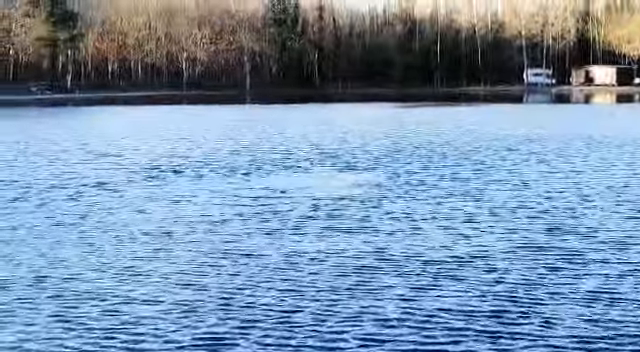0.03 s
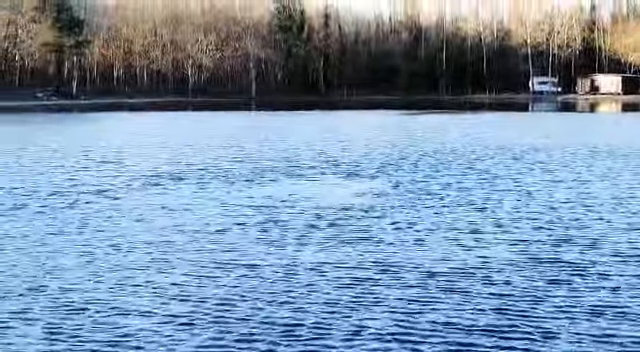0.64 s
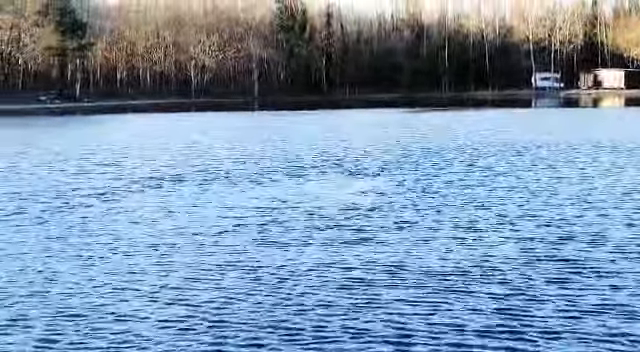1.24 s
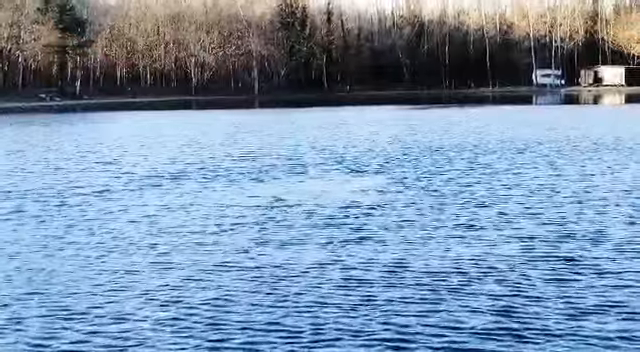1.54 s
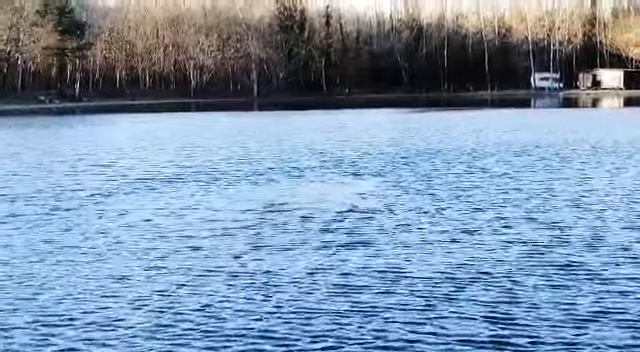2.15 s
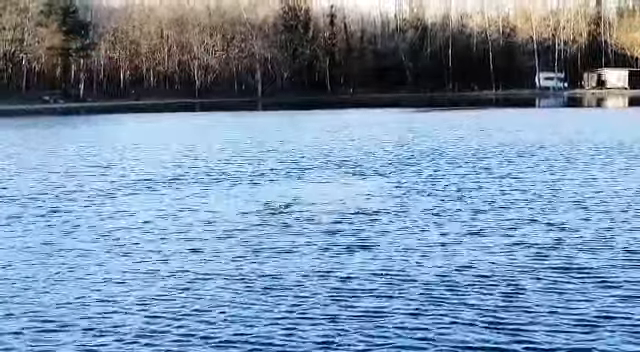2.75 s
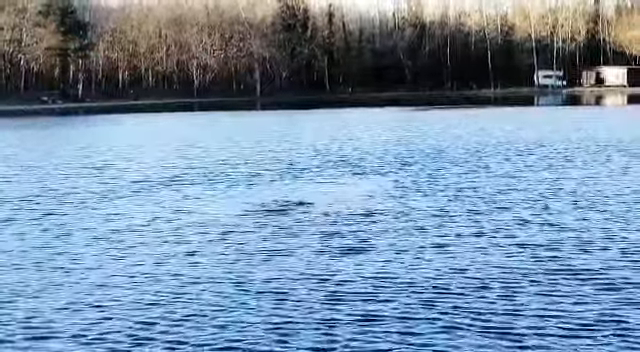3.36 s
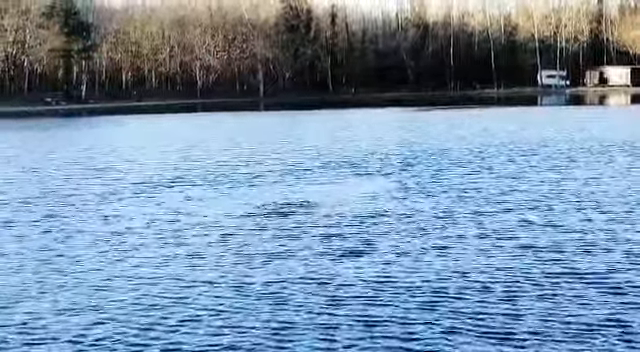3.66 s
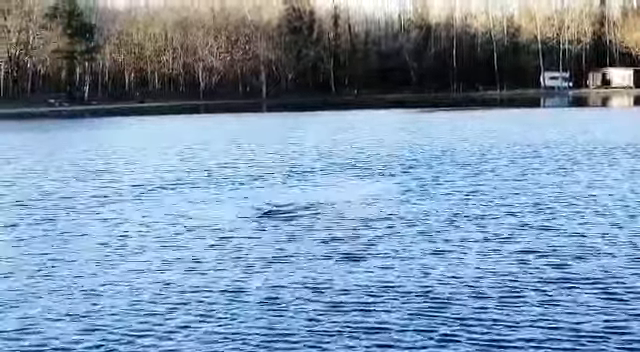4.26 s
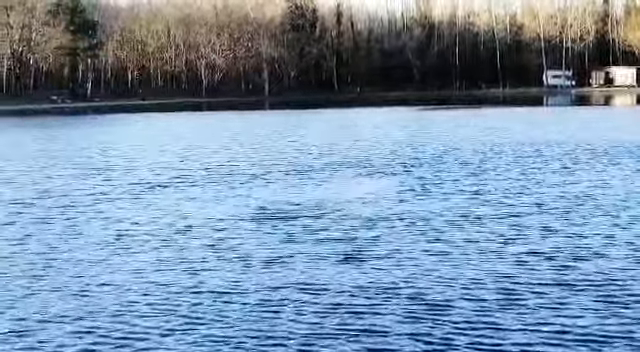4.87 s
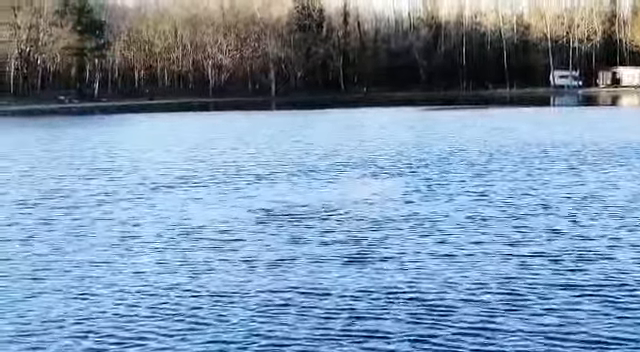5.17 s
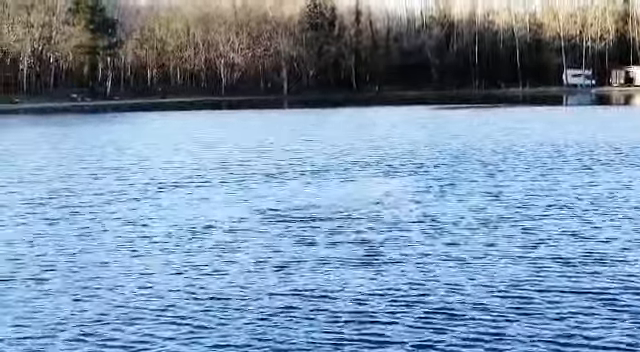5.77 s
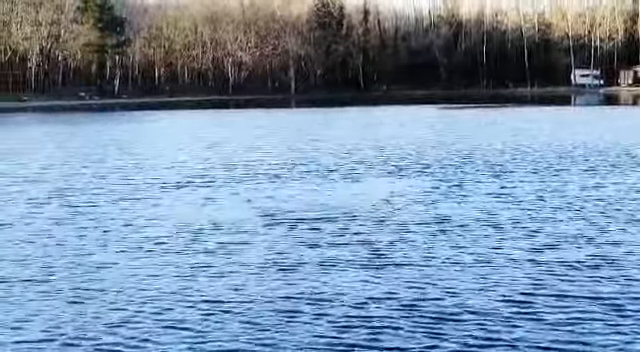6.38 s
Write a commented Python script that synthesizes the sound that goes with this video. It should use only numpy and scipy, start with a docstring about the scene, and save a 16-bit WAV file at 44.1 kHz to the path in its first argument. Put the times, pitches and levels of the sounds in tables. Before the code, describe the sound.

A fishing reel sits close on the left, outdoors by a lake. From 0.1 to 0.9 seconds its drag gives three bright, metallic buzzes that speed up and brake, over a soft whirr of winding. The handle clacks at about 1.1 seconds, and taut line rubs faintly through the rod's rings until 1.5. Low wind buffets the microphone, strongest from 1.3 to 2.3 seconds and in a sharp gust near 3.6, shifting between sides. The drag zips briefly at 1.8 seconds, ticks four times, and zips again at 2.8. A few faint water plinks sound between 2.9 and 3.8 seconds. After a click near 4.3, four quick drag bursts run with more winding until 5.3 seconds, ending in a light knock and one last tick. Light wind and a faint, steady rustle of distant trees continue to the end, at about 6.6 seconds.

```python
"""A spinning reel's drag ticks and buzzes as a hooked fish takes line off a lake shore: the pawl snaps
over the spool's teeth, in single clicks and in short pulls that speed up and brake again.
The angler winds in two spells: gears whirr, the rotor taps and the handle stops with a clack.
The taut line creeps once through the rod's rings. Gusts buffet the two microphone ports,
far trees rustle, and ripples plink at the bank as small bubbles ring."""
import sys
import numpy as np
from scipy import signal
from scipy.fft import rfft, irfft, next_fast_len
from scipy.io import wavfile
from scipy.ndimage import map_coordinates

SR = 44100
rng = np.random.default_rng(int(sys.argv[2]) if len(sys.argv) > 2 else 0)


def master_out(mix):
    """Clip the mix to full scale and print it as 16-bit PCM to the path in sys.argv[1]."""
    frames = np.transpose(np.atleast_2d(mix))
    ceiling = np.clip(frames, -1, 1)
    pcm = np.round(ceiling * 32767).astype(np.int16)
    wavfile.write(sys.argv[1], SR, pcm)


N = 292406

# The fish pulls, the spool spins up and brakes. Each row: first click, fastest moment and last click
# in seconds, top and final speed in teeth per second, click level in dB.
PULLS = [(.1204, .265, .372, 187, 125, -23.3), (.58, .625, .6996, 190, 50, -24),
         (.7484, .85, .8975, 285, 120, -24.5), (1.7463, 1.798, 1.8392, 96, 45, -22.5),
         (2.7762, 2.813, 2.8442, 90, 45, -24), (4.4429, 4.469, 4.4947, 63, 50, -23.7),
         (4.5116, 4.592, 4.661, 222, 55, -23), (4.8312, 4.887, 4.9395, 270, 70, -24),
         (5.0364, 5.125, 5.2383, 320, 60, -23.7)]
SLIP_RATE = 45  # teeth per second at which the drag breaks loose


def amp(db):
    """Decibels to gain."""
    return 10 ** (np.asarray(db) / 20)


def unit(x):
    """x scaled to rms 1."""
    return x / np.sqrt(np.mean(x ** 2) + 1e-20)


def along(points, hz):
    """A curve through (Hz, value) points, read at hz on a log axis."""
    freqs, values = np.transpose(points)
    return np.interp(np.log(hz + 1), np.log(freqs + 1), values)


def curves(rows):
    """One per-sample envelope for each column after the time."""
    times, *columns = np.transpose(rows)
    return [np.interp(np.arange(N) / SR, times, column) for column in columns]


def wobble(rate):
    """A smooth random curve with rate knots a second."""
    knots = rng.standard_normal(int(N * rate / SR) + 4)
    return map_coordinates(knots, [np.arange(N) * rate / SR])


def arch(t, start, top, stop):
    """A half sine that rises from 0 at start to 1 at top and is back to 0 at stop."""
    return np.abs(np.sin(np.interp(t, [start, top, stop], [0, np.pi / 2, np.pi])))


def swells(rows):
    """Summed power of bell-shaped swells, each (centre s, half length s, dB)."""
    power = np.zeros(N)
    for centre, half, db in rows:
        i = np.arange(max(0, round((centre - 4 * half) * SR)), min(N, round((centre + 4 * half) * SR)))
        power[i] += (amp(db) * np.exp(-((i / SR - centre) / half) ** 2)) ** 2
    return power


def filtered(x, response):
    """x through a complex frequency response."""
    size = next_fast_len(N + SR // 2)
    return irfft(rfft(x, size) * response(np.fft.rfftfreq(size, 1 / SR)), size)[..., :N]


def delayed(x, seconds):
    """x arriving later."""
    return filtered(x, lambda hz: np.exp(-2j * np.pi * hz * seconds))


def noise(spectrum):
    """Coloured noise of rms 1."""
    return unit(filtered(rng.standard_normal(N), lambda hz: amp(along(spectrum, hz))))


def body(x, spectrum, modes=(), size=2048):
    """x through a body of unit energy: a broad colour with resonances on it."""
    hz = np.fft.rfftfreq(size, 1 / SR)
    peaks_db = sum(db / (1 + (2 * (hz - centre) / width) ** 2) for centre, width, db in modes)
    cepstrum = irfft(np.log(amp(along(spectrum, hz) + peaks_db)))
    cepstrum[1:size // 2] *= 2  # minimum phase: the ring follows the hit
    cepstrum[size // 2 + 1:] = 0
    ring = irfft(np.exp(rfft(cepstrum)))
    return signal.fftconvolve(x, ring[None] / np.linalg.norm(ring), axes=1)[:, :N]


def ringing(x, modes):
    """x exciting resonators, each (Hz, width Hz, dB)."""
    return filtered(x, lambda hz: sum(amp(db) * 1j * hz * width / (centre**2 - hz**2 + 1j * hz * width)
                                      for centre, width, db in modes))


def contacts(rows, chatter_s, tail_db, tail_t60, scatter, repeat):
    """Each (s, dB) contact chatters and leaves a weak tail; repeat is the share alike in every hit."""
    t = np.arange(SR // 20) / SR
    shape = np.exp(-(t / chatter_s) ** 1.2) + amp(tail_db - 60 * t / tail_t60)
    shape *= np.sqrt(SR * .005 / np.sum(shape ** 2))
    # The same parts meet each time: one rattle, even in colour, each pitch arriving a little late.
    hz = np.fft.rfftfreq(len(t), 1 / SR)
    late_s = chatter_s * np.interp(hz, np.linspace(0, SR / 2, 60), .1 + .8 * rng.random(60) ** 2)
    rattle = irfft(np.exp(-2j * np.pi * np.cumsum(late_s) * hz[1]), len(t)) * (1 - t / t[-1])
    rattle *= np.linalg.norm(shape) / np.linalg.norm(rattle)
    out = np.zeros((2, N + SR))
    for start, db in rows:
        grit = rng.standard_normal((3, len(t)))
        fresh = shape * (grit[0] + scatter * grit[1:]) / np.hypot(1, scatter)  # ports partly alike
        hit = np.sqrt(repeat) * rattle + np.sqrt(1 - repeat) * fresh
        out[:, round(start * SR):][:, :len(t)] += amp(db) * hit
    return out[:, :N]


def turbulence(rumble, buffet, puffs, eddy_db=-15.8, eddy_growth=1.2, strong_db=-39):
    """Wind flutters on one port, and strong gusts break into smaller, brighter eddies."""
    # Colours of the three wind layers. Each row: frequency in Hz, level in dB.
    rumble_colour = [(10, -20), (25, -6.5), (50, -1), (95, -1.5), (140, -5), (300, -67)]
    buffet_colour = [(60, -30.5), (110, -3), (170, -0.5), (250, -7.5), (400, -19.5), (600, -37),
                     (1000, -47), (2500, -63.5)]
    eddy_colour = [(80, -13.5), (200, 4), (350, -3.5), (520, -7), (800, -13), (1200, -29.5), (3000, -61)]
    flutter = unit(amp(1.2 * wobble(14)))
    lumps = unit(amp(3.9 * wobble(60)))
    flicker = unit(amp(6.5 * wobble(70)))
    eddies = amp(strong_db + eddy_db) * (buffet / amp(strong_db)) ** eddy_growth * flicker + puffs
    low_end = rumble * noise(rumble_colour) + buffet * lumps * noise(buffet_colour)
    return flutter * low_end + eddies * noise(eddy_colour)


def wind(rumble_db=-.3, buffet_db=-.6, spread_hz=240):
    """Gusts ride on a breeze that shifts between the two microphone ports."""
    # The breeze. Each row: time in seconds, rumble and buffet levels in dB.
    breeze = [(0.0, -46.0, -45.0), (0.14, -48.0, -47.0), (0.25, -49.0, -56.0), (0.52, -50.0, -56.0),
              (1.02, -45.0, -47.0), (1.3, -37.0, -34.0), (1.53, -37.0, -36.0), (1.63, -48.0, -50.0),
              (1.8, -40.0, -39.0), (2.21, -37.0, -33.0), (2.3, -49.0, -51.0), (2.43, -53.0, -61.0),
              (2.9, -45.0, -50.0), (3.15, -51.0, -50.0), (3.55, -51.0, -51.0), (3.76, -48.0, -48.0),
              (3.9, -57.0, -65.0), (4.35, -51.0, -53.0), (4.65, -62.0, -66.0), (5.18, -60.0, -66.0),
              (5.33, -53.0, -63.0), (5.85, -61.0, -68.0), (6.35, -59.0, -67.0), (6.63, -49.0, -59.0)]
    # Short gusts. Each row: centre and half length in seconds, rumble and buffet levels in dB.
    gusts = [(0.44, 0.025, -55.0, -50.0), (0.61, 0.025, -46.0, -44.0), (0.87, 0.03, -42.0, -49.0),
             (1.11, 0.025, -39.0, -43.0), (1.88, 0.03, -41.0, -34.0), (2.51, 0.025, -45.0, -50.0),
             (2.7, 0.035, -37.0, -41.0), (2.8, 0.035, -48.0, -42.0), (2.95, 0.03, -43.0, -42.0),
             (3.09, 0.04, -40.0, -40.0), (3.19, 0.035, -42.0, -41.0), (3.295, 0.02, -55.0, -42.0),
             (3.41, 0.035, -50.0, -41.0), (3.645, 0.025, -34.0, -33.0), (4.07, 0.05, -54.0, -45.0),
             (4.26, 0.025, -47.0, -52.0), (6.14, 0.05, -47.0, -53.0), (6.51, 0.055, -45.0, -49.0)]
    # Bursts of small eddies. Each row: centre and half length in seconds, level in dB.
    eddy_bursts = [(.06, .06, -57), (1.88, .03, -45), (2.011, .0083, -42), (2.13, .09, -48),
                   (2.208, .007, -35), (2.221, .008, -35.5), (3.19, .03, -49), (3.404, .007, -39.5),
                   (3.646, .011, -32)]
    # The wind's side. Each row: time in seconds, share of its power on the left port.
    side = [(1.9, .05), (2.1, .6), (2.4, 0.58), (2.6, .05), (3.2, .1), (3.5, .9), (3.8, .9), (4, .05),
            (5.3, .05), (5.6, .95)]
    low, high = amp(curves(breeze))
    rumble = amp(rumble_db) * np.sqrt(low ** 2 + swells((s, half, db) for s, half, db, _ in gusts))
    buffet = amp(buffet_db) * np.sqrt(high ** 2 + swells((s, half, db) for s, half, _, db in gusts))
    puffs = np.sqrt(swells(eddy_bursts))
    left = curves(side)[0]
    ports = np.array([np.sqrt(share) * turbulence(rumble, buffet, puffs) for share in (left, 1 - left)])
    # Each port bleeds into the other channel, lagging more in phase as the pitch rises.
    return ports + filtered(ports[::-1], lambda hz: (spread_hz - 1j * hz) / (spread_hz + 1j * hz))


def trees(level_db=-64.5):
    """Trees on the far shore make a wide, steady rustle."""
    # The rustle's colour. Each row: frequency in Hz, level in dB.
    colour = [(30, 6), (150, -1), (300, -1), (550, -4), (900, -0.5), (1400, -6.5), (2500, -11.5),
              (4400, -12.5), (6200, -16), (8200, -12), (10500, -21), (16000, -24)]
    # Its stereo image. Each row: frequency in Hz, left-right correlation.
    likeness = [(60, .92), (130, .76), (290, 1), (600, -0.53), (1400, -0.015), (3000, 0)]

    def mid_side_gains(hz):
        angle = np.arccos(along(likeness, hz)) / 2
        return np.array([np.cos(angle), np.sin(angle)])

    mid, side = filtered(np.array([noise(colour), noise(colour)]), mid_side_gains)
    sway = amp(.25 * wobble(4))
    return amp(level_db) * sway * np.array([mid + side, mid - side])


def spool_speed(pointedness=1.4):
    """Teeth per second: each pull is one arch of speed, cut off when the drag grips again."""
    speed = np.full(N, float(SLIP_RATE))
    for start, top, stop, top_rate, last_rate, _ in PULLS:
        i = np.arange(round(start * SR), round(stop * SR))
        edge_rate = np.where(i / SR < top, SLIP_RATE, last_rate)
        speed[i] = edge_rate + (top_rate - edge_rate) * arch(i / SR, start, top, stop) ** pointedness
    return speed


def teeth(speed, start, stop, db, slack_db=1.8, db_per_tooth_hz=.01, jitter_s=.00003, uneven_db=1):
    """One (s, dB) click per tooth passing the pawl, weaker at speed and as the line slackens."""
    i = np.arange(round(start * SR), round(stop * SR))
    passed = np.cumsum(speed[i]) / SR
    at = np.interp(np.linspace(0, passed[-1], round(passed[-1]) + 1), passed, i)
    progress = (at / SR - start) / (stop - start)
    level = db - slack_db * progress - db_per_tooth_hz * speed[at.astype(int)]
    return np.c_[at / SR, level] + rng.standard_normal((len(at), 2)) * [jitter_s, uneven_db]


def drag(skip_rate=130, sing_rate=250, ping_db=7.5, sing_db=18.5, ground_s=.0064, ground_db=-21):
    """The pawl snaps into the spool, which pings; at speed it skips, brighter, and one mode sings."""
    # The spool gives by a single tooth. Each row: start in seconds, level in dB.
    single_clicks = [(0.0624, -23), (0.1055, -40), (0.4146, -35.4), (0.5534, -22), (0.7214, -29.5),
                     (0.9174, -26), (0.9925, -38), (1.0246, -29), (1.7181, -37.5), (1.8714, -22.5),
                     (1.9249, -23), (1.9835, -24.5), (2.0433, -23.5), (2.7337, -42), (2.7485, -24.5),
                     (4.2679, -25), (4.4061, -24.5), (4.7382, -33.7), (4.7789, -32.5), (4.9615, -25.5),
                     (4.9838, -32), (4.995, -31.5), (5.5737, -36.5)]
    # The colour of the pawl's snap. Each row: frequency in Hz, level in dB.
    snap_colour = [(500, -53.5), (1500, -40.5), (2600, -34), (3100, -22), (4400, -19.5), (5200, -15),
                   (5800, -2), (7500, 1), (9400, 0), (10200, -13), (11700, -17.5), (12600, -22.5),
                   (14000, -20), (16000, -23.5)]
    # Resonances. Each row: centre and width in Hz, gain in dB.
    spool_modes = [(3170, 140, 10.5), (5470, 120, 2.5), (7100, 200, 5.5), (7980, 220, 6.5), (8680, 270, 5),
                   (9330, 220, 3.5)]  # spool and clicker
    skip_modes = [(3170, 300, -5), (6800, 1300, -6), (5100, 1200, 5), (13600, 5000, 3.5)]  # peaks and dips added when the pawl skips
    ping_modes = [(8058, 40, 0), (6850, 50, -6)]  # the spool's slowly dying ring
    sing_modes = [(8060, 150, -2.5)]  # builds up with speed
    speed = spool_speed()
    runs = [teeth(speed, start, stop, db) for start, _, stop, _, _, db in PULLS]
    clicks = np.vstack([single_clicks] + runs)
    hits = contacts(clicks, chatter_s=.003, tail_db=-20, tail_t60=.04, scatter=1.1, repeat=.62)
    skipping = np.clip((speed - SLIP_RATE) / (skip_rate - SLIP_RATE), 0, 1) ** 2
    snaps = amp(-1) * body(hits * (1 - skipping), snap_colour, spool_modes)
    skips = amp(-.5) * body(hits * skipping, snap_colour, spool_modes + skip_modes)
    ping = amp(ping_db) * ringing(hits, ping_modes)
    sing = amp(sing_db) * ringing(hits * (speed / sing_rate) ** 2, sing_modes)
    direct = snaps + skips + ping + sing
    return direct + amp(ground_db) * delayed(direct, ground_s)  # one bounce off the ground


def handle():
    """Play in the handle knocks, hardest where the winding stops; the rotor taps more dully."""
    # Contacts. Each row: start in seconds, level in dB.
    knocks = [(.072, -40), (.957, -44.5), (1.062, -38), (1.069, -32), (1.076, -27.5), (1.083, -32),
              (1.094, -33.5), (1.362, -57.5), (5.302, -40), (5.31, -40)]  # handle and line roller
    taps = [(.365, -46), (.568, -45.5), (.773, -47.5), (4.514, -48.5), (4.75, -55), (4.78, -48.5)]  # turning rotor
    # Their colours. Each row: frequency in Hz, level in dB.
    handle_colour = [(600, -29), (1250, -14), (1800, -5.5), (2500, -9), (4300, 3), (6000, 1), (8000, 11.5),
                     (10000, -6.5), (16000, -22)]
    rotor_colour = [(600, -25), (1300, -9.5), (1900, 2), (2600, -10), (5000, -21)]
    loose = dict(tail_db=-15, tail_t60=.05, scatter=.7, repeat=.1)
    knocking = body(contacts(knocks, chatter_s=.0025, **loose), handle_colour)
    tapping = body(contacts(taps, chatter_s=.00397, **loose), rotor_colour)
    return knocking + tapping


def winding(level_db=10.5, grain_db=3, tick_db=-4, roundness=.75):
    """Gears whirr with a fine grain as the handle turns; line laid on the spool adds sparse ticks."""
    # Spells of winding, each one swell. Each row: start and stop in seconds, level in dB.
    spells = [(.11, 1.12, -59.5), (4.4, 5.29, -60)]
    # The gears' colour. Each row: frequency in Hz, level in dB.
    colour = [(500, -11.5), (900, -7), (1300, -0.5), (1700, 4), (2700, 0.5), (3800, 4.5), (5500, 0.5),
              (8200, 8.5), (9600, 2.5), (11000, -4.5), (16000, -16.5)]
    t = np.arange(N) / SR
    turning = sum(amp(db) * arch(t, start, (start + stop) / 2, stop) ** roundness
                  for start, stop, db in spells)
    grain = unit(amp(grain_db * wobble(220)))
    ticks = unit(amp(8 * wobble(300)))
    texture = unit(grain + amp(tick_db) * ticks)
    return amp(level_db) * turning * texture * np.array([noise(colour), noise(colour)])


def line_creep(grain_db=2):
    """The taut, creeping line rubs the rod's rings, which ring faintly."""
    # The rub's envelope. Each row: time in seconds, level in dB.
    creep = [(1.05, -100), (1.11, -64), (1.21, -62), (1.3, -69.5), (1.4, -75), (1.48, -69), (1.53, -100)]
    # Its colour. Each row: frequency in Hz, level in dB.
    colour = [(2000, -25), (3500, -7), (6800, -6.5), (8200, 2.5), (9500, -8), (12000, -21.5)]
    # The rings' resonances. Each row: centre and width in Hz, gain in dB.
    ring_modes = [(3940, 290, 15.5), (5050, 300, 14), (6080, 300, 6.5)]
    rub = amp(curves(creep)[0] + grain_db * wobble(110)) * rng.standard_normal((2, N))
    return body(rub, colour, ring_modes)


def ripples(t60=.033, rise_s=.0011, glide=.96):
    """Small bubbles ring at the bank, each rising a little in pitch."""
    # Bubble plinks. Each row: start in seconds, starting pitch in Hz, level in dB.
    plinks = [(2.851, 2150, -46.5), (2.96, 1380, -61), (2.981, 970, -57), (2.993, 1400, -60),
              (3.097, 1360, -54.5), (3.767, 1140, -59)]
    t = np.arange(SR // 10) / SR
    out = np.zeros(N + SR)
    for start, hz, db in plinks:
        envelope = amp(db - 60 * t / t60) * (1 - np.exp(-t / rise_s))
        out[round(start * SR):][:len(t)] += envelope * np.sin(2 * np.pi * hz * t * (1 + glide * t))
    return out[:N]


def scene():
    """The reel is close by on the left, in the open air; its sound reaches the right port later."""
    # The reel's tone at the far port. Each row: frequency in Hz, gain against the left in dB.
    shadow = [(1300, -3.5), (3000, -7.5), (4500, -2.5), (5700, -9), (8000, -16), (8700, -16), (10500, -4.5),
              (11900, 8), (13000, 7), (15500, 0)]
    near, far = drag() + winding() + handle() + line_creep()
    far = filtered(far, lambda hz: amp(along(shadow, hz)))
    reel = np.array([near, delayed(far, seconds=.00046)])
    return reel + wind() + trees() + ripples()


def record(dry):
    """A steep low-pass cuts off the very top of the treble."""
    top_hz = 15750
    return filtered(dry, lambda hz: 1 / np.sqrt(1 + (hz / top_hz) ** 200))


dry = scene()
out = record(dry)
master_out(out)
```